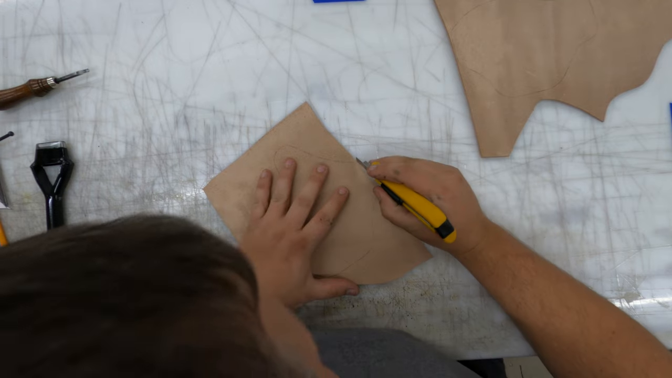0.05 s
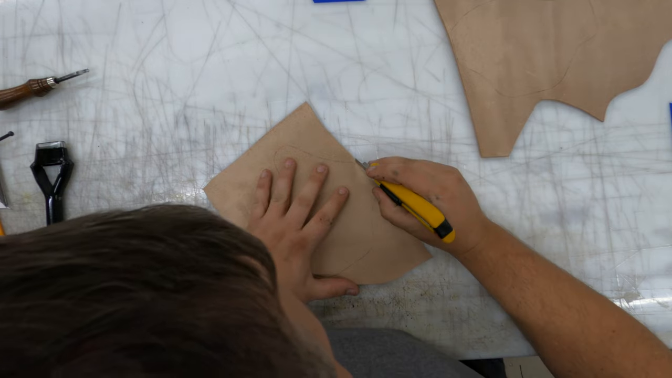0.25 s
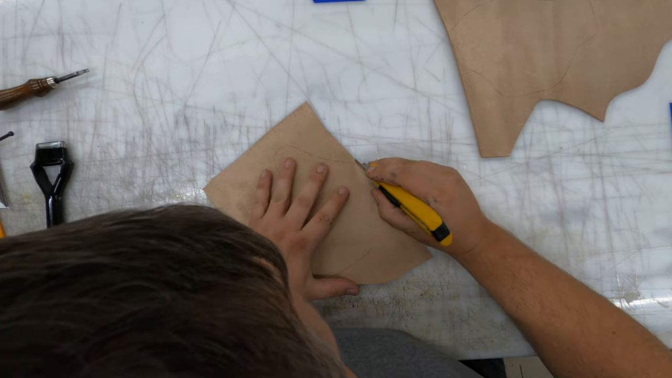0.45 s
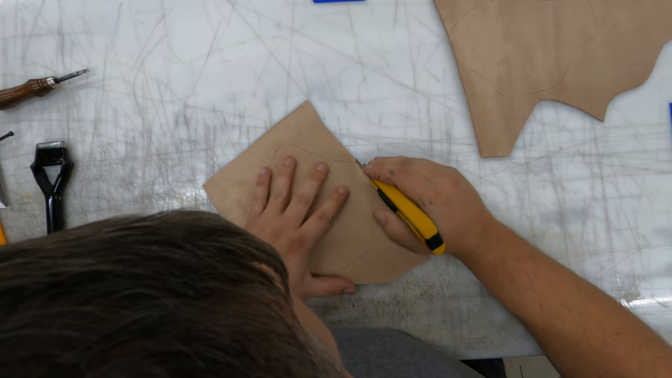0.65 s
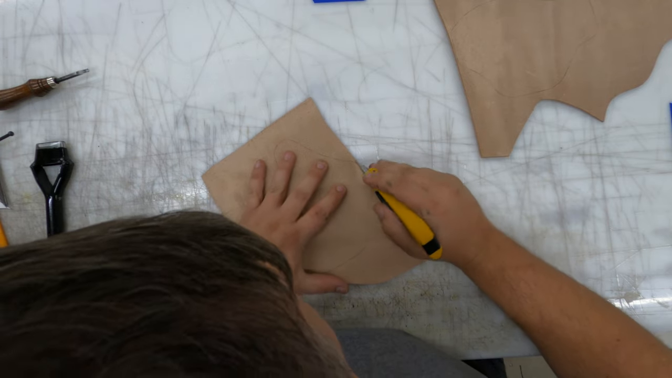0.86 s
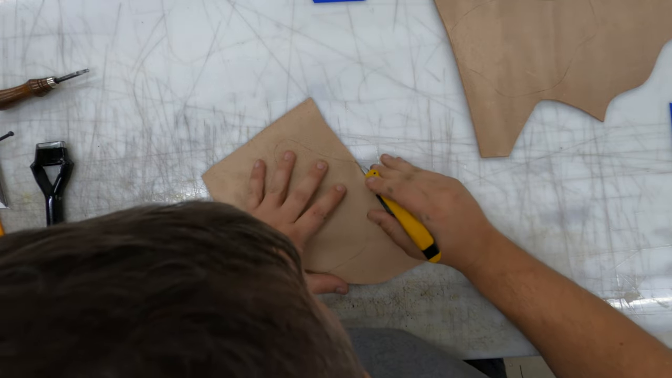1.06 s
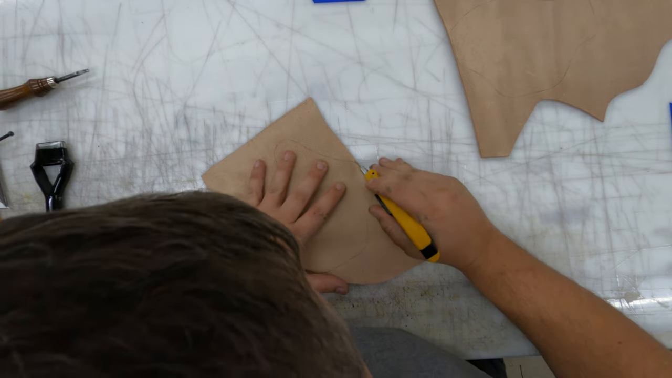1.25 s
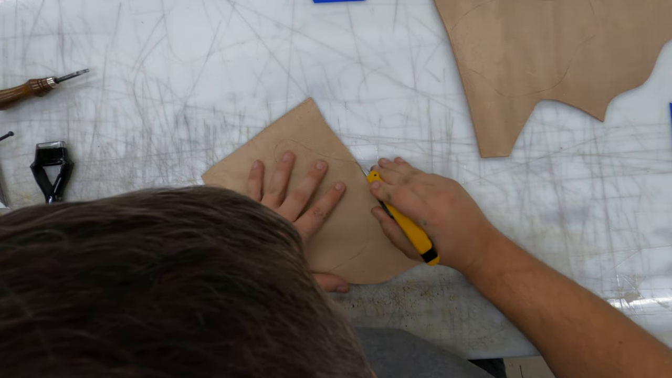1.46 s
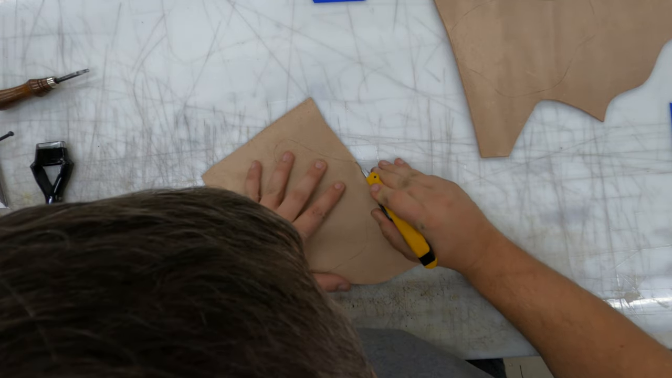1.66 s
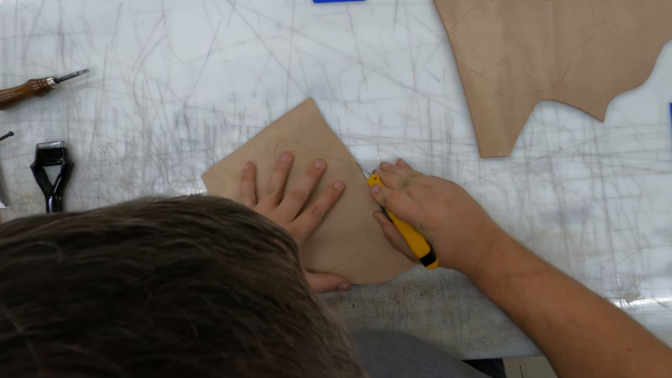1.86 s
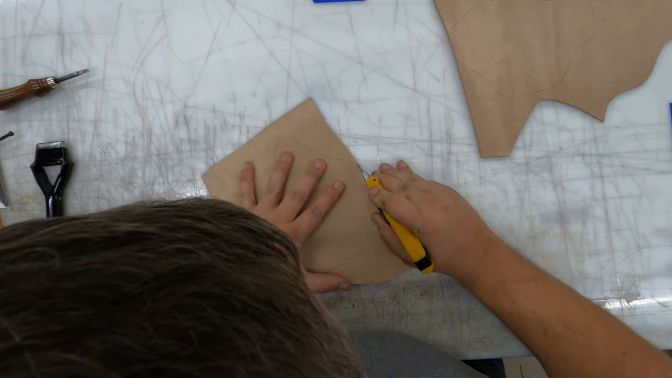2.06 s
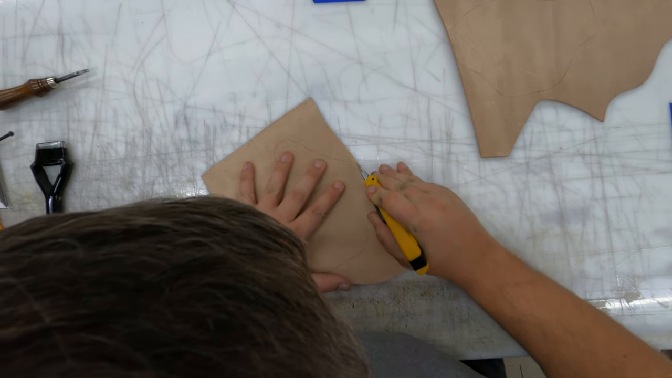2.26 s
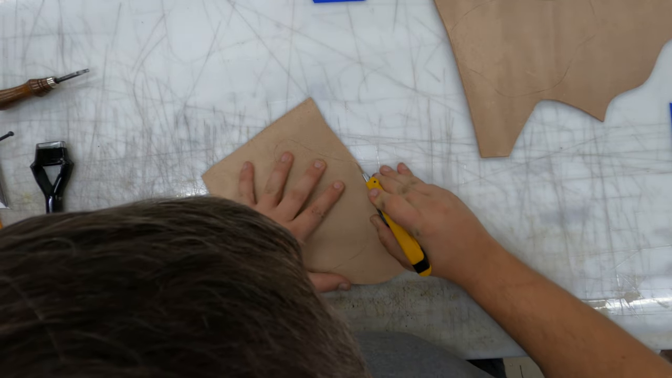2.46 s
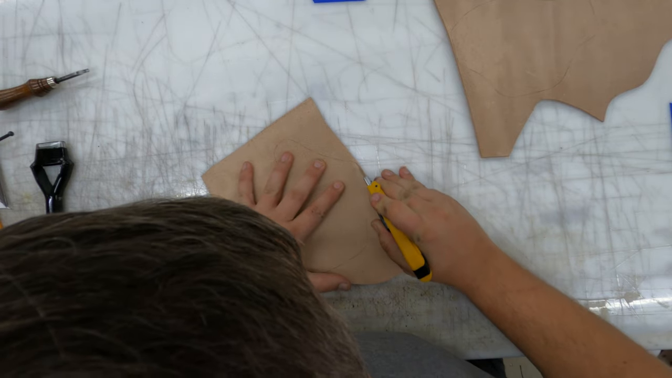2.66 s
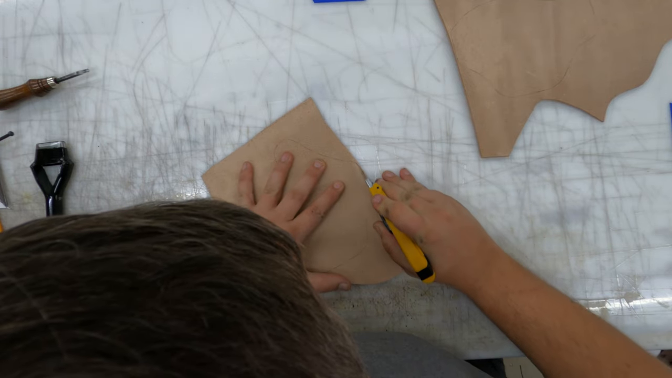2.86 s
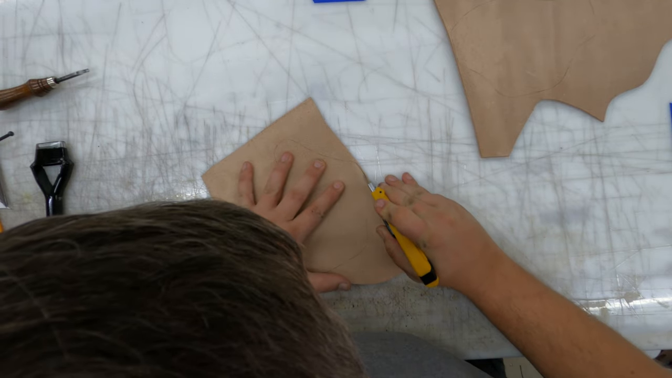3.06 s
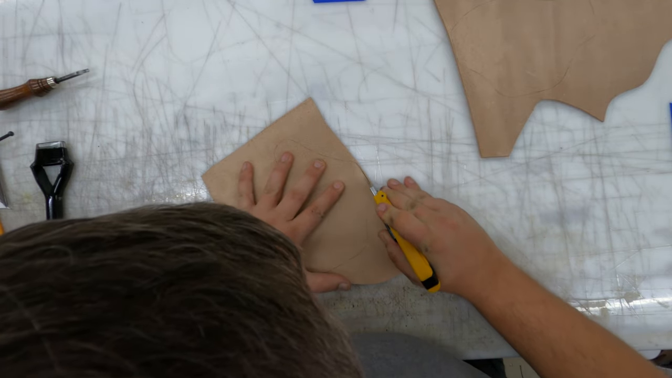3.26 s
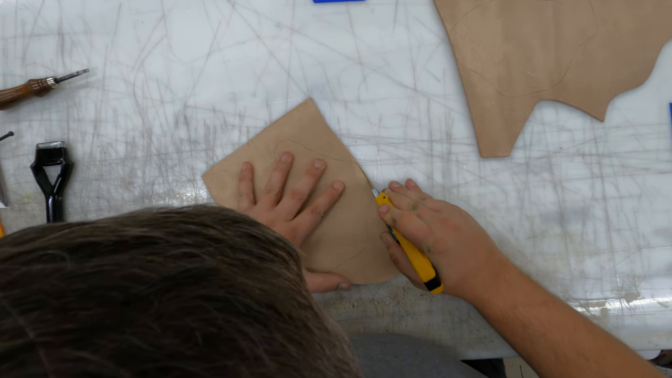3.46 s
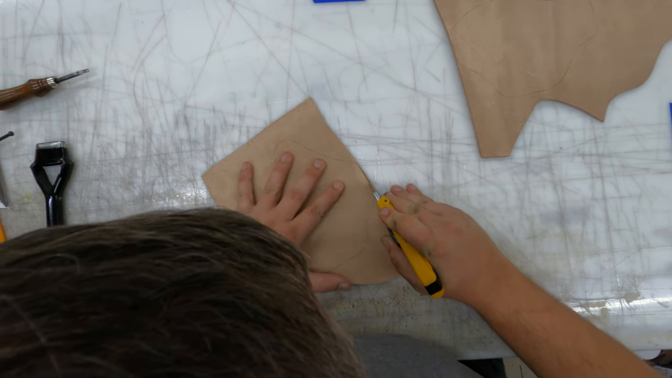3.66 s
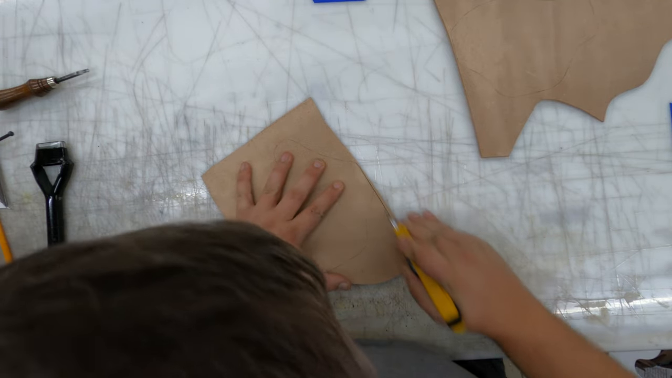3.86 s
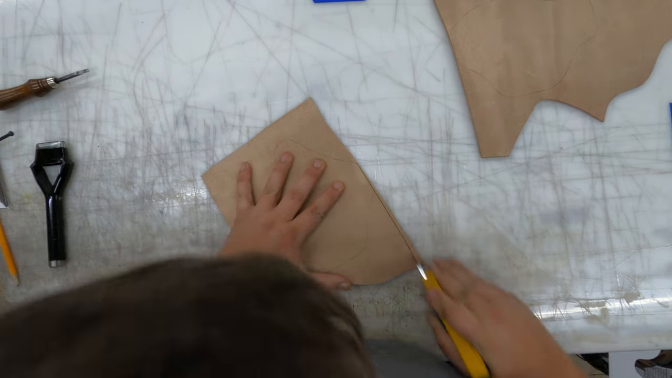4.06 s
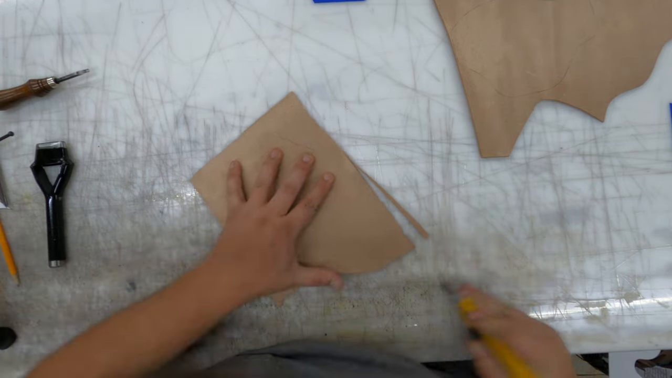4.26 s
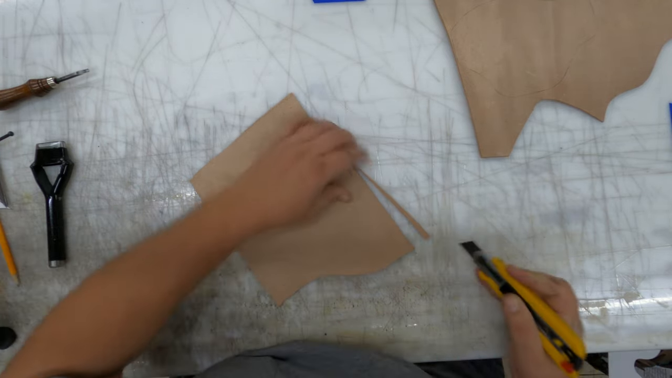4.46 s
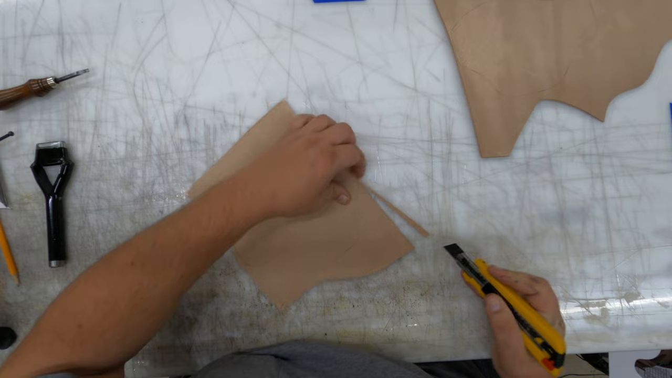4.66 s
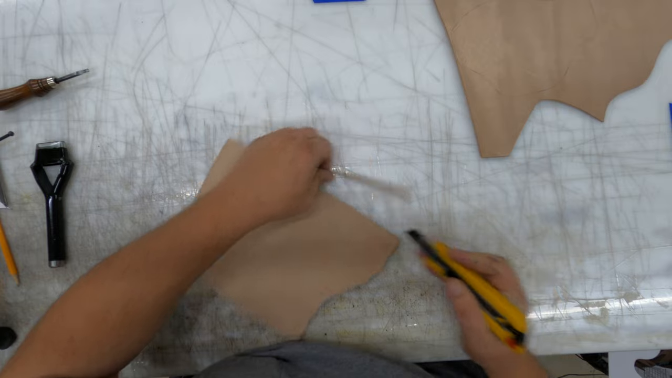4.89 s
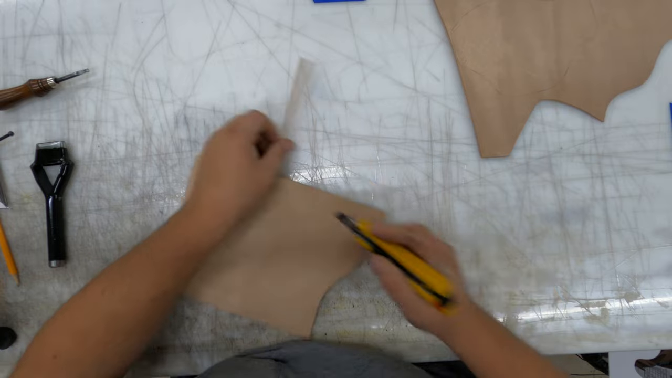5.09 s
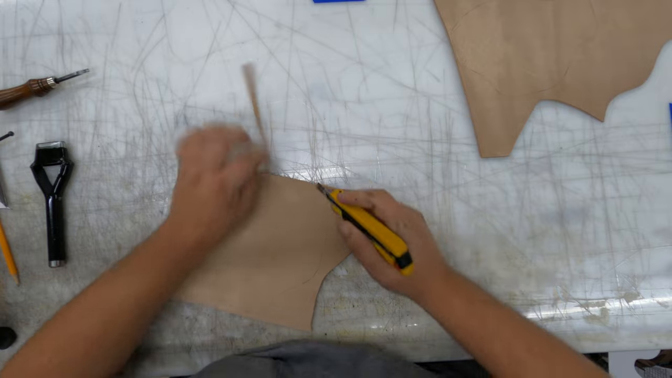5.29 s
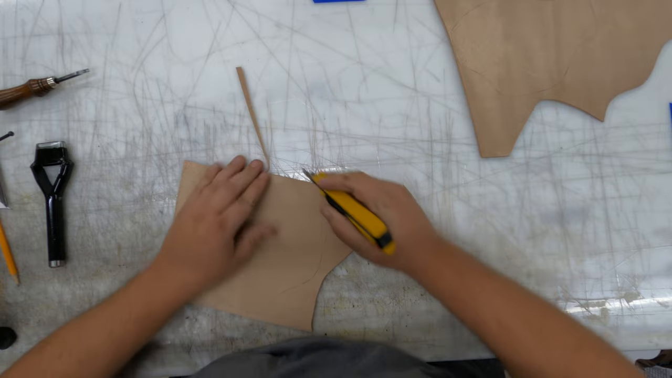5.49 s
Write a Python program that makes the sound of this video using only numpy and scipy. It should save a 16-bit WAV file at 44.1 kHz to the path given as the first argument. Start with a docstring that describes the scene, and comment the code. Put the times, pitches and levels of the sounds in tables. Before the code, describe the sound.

A utility knife trims thick leather on a plastic cutting board, close to the microphone in a quiet workshop with a short, dull echo. Small clicks of the knife and its loose blade sound during the first second. From about 1.5 to 2 seconds come firmer clicks and knocks as the knife is set down, with brief sliding of leather. Around 2.4 seconds the blade starts creeping through in faint, scratchy catches with a slight ring. At 3.7 seconds it speeds into one louder, hissing rasp that ends near 4.2. A couple of light clicks and a faint brush of skin follow. At 4.5 seconds a hand thumps the board softly, and the leather swivels, its rough back rubbing on the plastic among small knocks. The knife clicks down at about 5.3 seconds, followed by one more soft bump.

```python
"""A utility knife trims thick leather on a plastic cutting board, close by in a quiet workshop.
The blade creeps along in short catches, snapping fibres that make the knife ring, then runs out
in one quick stroke where the snaps blur into a rasp. Before the cut, the knife clicks as it is
set down. Afterwards a hand bumps the board and swivels the leather round, so that its rough back
rubs on the plastic, and the knife is set down again."""
import sys
import numpy as np
from scipy import signal
from scipy.fft import rfft, irfft
from scipy.io import wavfile
from scipy.ndimage import map_coordinates

SR = 44100
rng = np.random.default_rng(int(sys.argv[2]) if len(sys.argv) > 2 else 0)


def transcribe(signal):
    """Save signal, clipped to [-1, 1], as a 16-bit WAV file at the path in sys.argv[1]."""
    frames = np.atleast_2d(signal).T
    limited = np.clip(frames, -1, 1)
    pcm = np.round(limited * 32767).astype(np.int16)
    wavfile.write(sys.argv[1], SR, pcm)


N = 243873
T = np.arange(N) / SR
RUN_S, EXIT_S = 3.702, 4.178  # the blade starts to speed up; it leaves the leather
PUSH_ATTACK_S = 0.0079


def undb(db):
    """Turn decibels into a number to multiply by."""
    return 10 ** (np.asarray(db) / 20)


def unit(x):
    """Scale a sound to an average power of 1."""
    return x / np.sqrt(np.mean(x ** 2))


def fade(t, t60):
    """Start at t = 0 and die away, losing 60 dB every t60 seconds."""
    return (t >= 0) * np.exp(-np.log(1000) * np.maximum(t, 0) / t60)


def envelope(start_s, length_s, attack_s, t60):
    """Rise, hold until the length is over, then die away."""
    return np.clip((T - start_s) / attack_s, 0, 1) * fade(np.maximum(T - start_s - length_s, 0), t60)


def add(track, start_s, sound):
    """Mix a sound into the track at the given time."""
    i = max(int(start_s * SR), 0)
    track[i:i + len(sound)] += sound[:N - i]


def wander(rate):
    """A random drift, about 1 in size, that turns rate times a second."""
    return unit(np.interp(T * rate, np.arange(N), rng.standard_normal(N)))


def colour(x, points):
    """Shape the tone along (pitch_hz, level_db) points. Only the gaps between levels matter."""
    hz, db = np.transpose(points)
    octave = np.log2(np.maximum(np.fft.rfftfreq(8192, 1 / SR), 1))
    octaves_outside = np.maximum(np.log2(hz[0]) - octave, 0) + np.maximum(octave - np.log2(hz[-1]), 0)
    curve_db = np.interp(octave, np.log2(hz), db) - 20 * np.minimum(octaves_outside, 2)
    # build the filter so that it never sounds ahead of its input
    cepstrum = irfft(np.log(undb(curve_db)))
    half = len(cepstrum) // 2
    response = irfft(np.exp(rfft(2 * cepstrum[:half], 2 * half)))
    return signal.fftconvolve(x, response / np.linalg.norm(response))[:N]


def resonate(x, hz, width_hz):
    """Ring at one pitch; the narrower the width, the longer the ring."""
    return signal.lfilter(*signal.iirpeak(hz, hz / width_hz, fs=SR), x)


def ring(x, modes):
    """Shake an object's natural notes (modes); neighbouring ones swing in opposite directions."""
    response = sum((-1) ** k * undb(db) * np.sin(2 * np.pi * hz * T) * fade(T, t60)
                   for k, (hz, t60, db) in enumerate(modes))
    return signal.fftconvolve(x, response / np.linalg.norm(response))[:N]


def grains(rate, spread_db, slip_rate, slip_db, smooth):
    """Tiny snaps, rate a second, over smooth friction; sticking and slipping bunches them up."""
    snaps = (rng.random(N) < rate / SR) * rng.choice([-1, 1], N)
    sizes = undb(spread_db * np.clip(rng.standard_normal(N), -2, 2))
    friction = unit(snaps * sizes) + smooth * rng.standard_normal(N)
    return unit(friction * undb(slip_db * wander(slip_rate)))


# Tone of the quiet room: pitch_hz, level_db
ROOM_TONE = [(20, -2), (53, -13.5), (88, 0), (125, -4.5), (200, -6.5), (270, -10), (400, -15), (700, -18.5),
             (1600, -22.5), (3000, -26), (16000, -31.5)]

def background(room_db=-61, waver_db=1.0, hiss_db=-68.5):
    """Low room noise shared by both channels, plus each channel's own amplifier hiss."""
    air = unit(colour(rng.standard_normal(N), ROOM_TONE)) * undb(room_db + waver_db * wander(2.51))
    return air + undb(hiss_db) * rng.standard_normal((2, N))


def workshop_echo(dry, echo_db=-14, t60=0.23, dull_hz=2500):
    """The bench and walls add a short, dull echo."""
    t = T[:SR // 2]
    tail = rng.standard_normal(len(t)) * fade(t - .004, t60)
    tail = signal.sosfilt(signal.butter(1, dull_hz, fs=SR, output="sos"), tail / np.linalg.norm(tail))
    return dry + undb(echo_db) * signal.fftconvolve(dry, tail)[:N]


# A hand brushes past as the knife is lifted: start_s, length_s, level_db
SWISH = (4.32, 0.093, -57)
# Tone of skin on the board: pitch_hz, level_db
SKIN_TONE = [(3000, -12), (7000, -5), (13000, 0), (16000, -5)]

def hand_swish():
    """Skin skims the board with a short, bright hiss."""
    start_s, length_s, level_db = SWISH
    touch = np.sin(np.pi * np.clip((T - start_s) / length_s, 0, 1)) ** 2
    return colour(rng.standard_normal(N), SKIN_TONE) * touch * undb(level_db)


# Leather and hands sliding on the board: start_s, length_s, drag_db, hiss_db
SLIDES = [(0.573, 0.31, -64, -65), (1.07, .11, -65.5, -68), (1.505, 0.047, -57, -64),
          (1.759, 0.18, -53.5, -62), (4.238, 0.16, -62, -66), (4.663, .06, -57, -64.5),
          (4.725, 0.14, -52.5, -61.5), (4.837, .135, -55.5, -90), (5.072, 0.074, -58, -68),
          (5.226, 0.066, -55, -57), (5.452, 0.09, -66, -62.5)]
# Tone of the low drag: pitch_hz, level_db
DRAG_TONE = [(88, -27), (150, -7.5), (187, -6), (294, -10.5), (524, -7.5), (569, -12.5), (859, -8.5),
             (1210, -12.5), (1730, -14), (2410, -22.5), (4000, -30.5), (5200, -58), (8800, -120)]
# Tone of the hiss above it: pitch_hz, level_db
HISS_TONE = [(1760, -12.5), (3000, -10), (4930, -7.5), (6900, -10.5), (8820, -6.5), (10100, -15.5),
             (13300, -13), (16000, -20)]

def leather_rubbing(swivel_s=4.546, slowing_db_per_s=10.5, attack_s=0.045):
    """The leather's rough back drags over the board, which sings when the piece is swivelled."""
    turning = np.clip((T - swivel_s) / 0.19, 0, 1)  # a faint brushing stays from here on
    drag, hiss = turning * undb(-68), turning * undb(-62.5)
    for start_s, length_s, drag_db, hiss_db in SLIDES:
        slowing = undb(-slowing_db_per_s * np.clip(T - start_s, 0, length_s))
        drag += undb(drag_db) * slowing * envelope(start_s, length_s, attack_s, t60=0.19)
        hiss += undb(hiss_db) * slowing * envelope(start_s, length_s, attack_s, t60=0.49)
    roughness = grains(rate=4000, spread_db=1.5, slip_rate=65, slip_db=2.0, smooth=0.57)
    hum = unit(resonate(rng.standard_normal(N), hz=900, width_hz=70))
    hum *= turning * fade(T - swivel_s, t60=6.2) * undb(2)
    return (colour(roughness, DRAG_TONE) + hum) * drag + colour(roughness, HISS_TONE) * hiss * undb(-1)


# Soft blows of hand, knife and leather on the board: start_s, level_db, pitch_hz, fade_s
BUMPS = [(1.489, -40.5, 264, .022), (1.531, -34.5, 310, 0.027), (1.533, -38, 696, 0.026),
         (1.908, -32, 694, 0.03), (4.175, -43, 169, 0.052), (4.515, -24.5, 138, 0.025),
         (4.529, -38, 110, 0.054), (4.593, -31.5, 183, 0.018), (4.694, -48.5, 280, 0.065),
         (4.758, -38, 177, 0.034), (4.886, -37, 818, 0.043), (5.056, -26, 757, .012),
         (5.245, -33, 830, 0.014), (5.259, -39, 480, 0.026), (5.421, -26.5, 128, 0.011)]

def board_bumps(gain_db=4, ring_db=3):
    """Soft blows swing the board briefly and leave a faint ring."""
    t, thuds = T[:SR // 4], np.zeros(N)
    for start_s, level_db, pitch_hz, fade_s in BUMPS:
        press = np.sin(np.pi / 2 * np.minimum(t * pitch_hz / 0.55, 1)) ** 2
        swing = np.sin(2 * np.pi * pitch_hz * t) * fade(t, fade_s)
        add(thuds, start_s, undb(level_db + gain_db) * press * swing)
    return thuds + undb(ring_db) * resonate(thuds, hz=850, width_hz=11)


# Clicks of the knife and its loose blade: start_s, level_db, steel_extra_db, ping_hz
CLICKS = [(0.123, -64, -6, 3280), (0.1965, -61.5, 3, 3030), (.241, -52.5, -4, 3270),
          (0.442, -70, 19.5, 7950), (.4711, -48, 7.5, 5030), (.603, -58.5, 0, 1970),
          (0.7644, -54.5, -15, 3130), (1.487, -49, -9, 1350), (1.5306, -40, -3.5, 2080),
          (1.5543, -47, -8, 2140), (1.8025, -36.5, -7.5, 1410), (1.8335, -47.5, 0, 2080),
          (1.8523, -46, -4, 1490), (1.8657, -51.5, -6, 1530), (1.9075, -30, -9, 1410),
          (2.012, -59, 0, 5100), (4.268, -57, -1, 3180), (4.2931, -46.5, -5, 1830),
          (4.854, -45.5, -0.5, 1470), (4.934, -56, -12, 3520), (5.2506, -34, -10, 2090)]
# Natural notes of the board on its table: pitch_hz, fade_s, level_db
BOARD_MODES = [(113, 0.1, -5.5), (253, 0.065, -5.5), (407, 0.099, -7), (548, 0.04, -2.5), (716, 0.03, 3.5),
               (895, 0.064, -5), (1118, 0.019, 6), (1445, 0.016, 6.5), (1703, 0.011, 8)]
# Natural notes of the knife's plastic case: pitch_hz, fade_s, level_db
CASE_MODES = [(1794, 0.015, 8), (2080, 0.033, 3.5), (3250, 0.004, 5), (3400, 0.021, 0.5),
              (4400, 0.013, -19), (4930, 0.012, -29)]
# Natural notes of the steel blade: pitch_hz, fade_s, level_db
STEEL_MODES = [(5030, 0.017, -7), (7950, 0.0055, -3), (8840, 0.0053, 19), (11500, 0.005, -6)]
# Tone of a click in the case: pitch_hz, level_db
CASE_TONE = [(700, -6), (1400, -6), (2100, 1.5), (3000, 1.5), (5200, -1.5), (7000, -7.5)]
# Tone of a click in the steel: pitch_hz, level_db
STEEL_TONE = [(4000, -29), (6500, -8), (8200, 9.5), (10500, 3), (16000, -2.5)]

def knife_clicks(firm_db=-46, crack=3.2, push=5.1, onset_s=.0006):
    """Each click is a crack and a brief chatter in case and steel; a firm one also pushes the board."""
    t = T[:SR // 10]
    board, case, steel, pings = np.zeros((4, N))
    rise = np.minimum(t / onset_s, 1)
    blow = np.arange(len(t)) == int(onset_s * SR)
    for start_s, level_db, steel_extra_db, ping_hz in CLICKS:
        chatter = rng.standard_normal(len(t)) * rise * fade(t, t60=0.017)
        board_db = level_db - 0.66 * max(firm_db - level_db, 0)  # light clicks barely reach it
        add(board, start_s, undb(board_db) * (0.89 * chatter + push * blow))
        add(case, start_s, undb(level_db) * (chatter + crack * blow))
        add(steel, start_s, undb(level_db + steel_extra_db) * (chatter - crack * blow))
        ping = rise * np.sin(2 * np.pi * ping_hz * t) * fade(t, t60=0.014)
        add(pings, start_s, undb(level_db + 8) * ping)
    plastic = colour(case, CASE_TONE) + undb(-2.5) * ring(case, CASE_MODES)
    metal = colour(steel, STEEL_TONE) + undb(-13.5) * ring(steel, STEEL_MODES)
    return ring(board, BOARD_MODES) * undb(5) + plastic * undb(3) + metal * undb(5) + pings


def stroke_force(start_s=3.637, bear_down_s=0.13, rise_db=19.5, scrape_s=0.022):
    """The hand bears down to full force and holds it until the tip lifts off the board."""
    short_of_full = np.clip(1 - (T - start_s) / bear_down_s, 0, 1)
    contact = envelope(start_s, EXIT_S + scrape_s - start_s, PUSH_ATTACK_S, t60=0.17)
    return undb(-rise_db * short_of_full) * contact


def blade_speed(speed_up_s=.15):
    """How fast the blade moves: 0 is creeping, 1 is running."""
    return np.clip((T - RUN_S) / speed_up_s, 0, 1)


# Tone of the board under the cut: pitch_hz, level_db
RUMBLE_TONE = [(55, -13), (95, 0.5), (125, -2.5), (160, -5.5), (250, -4), (380, -12), (500, -17)]

def board_rumble(snaps):
    """Snapping fibres shake the board into a low rumble."""
    return colour(snaps, RUMBLE_TONE)


# Pushes of the blade through the leather, ending in short nudges: start_s, length_s, level_db
PUSHES = [(2.444, 0.19, -65), (2.636, .085, -60.5), (2.834, 0.041, -62), (2.873, 0.16, -59),
          (3.029, 0.24, -56), (3.346, 0.028, -60.5), (3.409, 0.041, -58), (3.479, 0.036, -58.5),
          (3.534, 0.052, -57), (3.622, 0.016, -59)]
# Natural notes of the knife pressed into the board: pitch_hz, width_hz, level_db
KNIFE_MODES = [(739, 31, 8.5), (1512, 170, 5.5), (1830, 80, 0), (2075, 45, 0.5), (2614, 250, -3),
               (3430, 190, -8.5), (4070, 120, -5.5), (5260, 100, -20), (7680, 490, -11.5), (8460, 170, -5),
               (9580, 98, -12), (10640, 130, -15), (13100, 1300, -19)]
# Tone of the creeping cut: pitch_hz, level_db
CREEP_TONE = [(210, -36), (350, -3), (498, -8.5), (730, -5), (817, 1.5), (1550, -4.5), (2310, -19),
              (2750, -15), (6530, -12.5), (8570, -14.5), (16000, -19.5)]

def slow_cut(catch_every_s=0.044, catch_length_s=0.02, breakaway_db=3.5, full_catch_db=-59):
    """Fibres part one by one and ring the knife; at each catch the blade slips and tears a bunch."""
    push, catches = np.zeros((2, N))
    jitter_s = 0.0015 * wander(24)
    for start_s, length_s, level_db in PUSHES:
        age_s = T - start_s
        progress = np.clip(age_s / length_s, 0, 1)
        effort = envelope(start_s, length_s, PUSH_ATTACK_S, t60=0.14)
        effort *= undb(level_db - 7 * (progress - 0.49) ** 2)  # hardest near the middle
        push += effort
        slip = np.minimum((age_s + jitter_s) % catch_every_s / catch_length_s, 1)
        # the first catch gets a boost; light pushes scrape more smoothly
        grip_db = breakaway_db * (age_s < catch_length_s) - 0.88 * max(full_catch_db - level_db, 0)
        catches += effort * np.sin(np.pi * slip) * undb(grip_db)
    snaps = grains(rate=2200, spread_db=5.5, slip_rate=220, slip_db=2.5, smooth=0.39)
    ringing = unit(sum(undb(db) * resonate(snaps, hz, width) for hz, width, db in KNIFE_MODES))
    knife = unit(ringing + undb(-4.5) * colour(snaps, CREEP_TONE))
    run_up = stroke_force()
    cutting = push * undb(1.17) + catches * undb(-3) + run_up * undb(-40)
    shaking = push * undb(1) + catches * undb(-8) + run_up * undb(-52)
    creeping = np.cos(np.pi / 2 * blade_speed())
    return creeping * (knife * cutting + board_rumble(snaps) * shaking)


def blade_song(hz, width_hz):
    """Friction makes the thin blade sing: a band of noise around a moving pitch."""
    lowpass = signal.butter(2, width_hz / 2, fs=SR, output="sos")
    swing = signal.sosfilt(lowpass, rng.standard_normal(N) + 1j * rng.standard_normal(N))
    return unit(np.real(swing * np.exp(2j * np.pi * np.cumsum(hz) / SR)))


def moving_contact(x, depth_db=4.1, spacing_hz=300, life_s=.04, rise_hz_per_s=4000):
    """As the point of contact moves, ringing pitches come and go, each gliding upward."""
    hz, t, spectrum = signal.stft(x, SR, nperseg=512)
    place = np.broadcast_arrays((hz[:, None] - rise_hz_per_s * t) / spacing_hz, t / life_s)
    strength = map_coordinates(rng.standard_normal(size=(128, 128)), place, order=3, mode="wrap")
    return unit(signal.istft(spectrum * undb(depth_db * strength), SR)[1][:N])


# Tone of the running blade's rasp: pitch_hz, level_db
RASP_TONE = [(240, -38), (400, -10.5), (511, -22), (700, -1.5), (796, -10), (884, 4), (1030, -3), (1530, 2),
             (1820, -4), (3080, -6.5), (3420, -12), (3940, -4.5), (6500, -20.5), (8450, -35), (14300, -120)]
# Tone of the hiss of tearing fibres: pitch_hz, level_db
FIBRE_TONE = [(3240, -12.5), (5500, -7.5), (7130, 0.5), (7590, 2), (8300, -1), (9660, 0.5), (10600, -3.5),
              (13100, -1), (14000, -4), (16000, -13)]

def quick_stroke(rasp_db=-39.5, hiss_db=-38.5, rumble_db=-46, rumble_fall_db_per_s=17.5, exit_db=-10):
    """At speed the snaps merge into a rasp, whose tone sweeps upward as the edge comes near."""
    snaps = grains(rate=5000, spread_db=5, slip_rate=340, slip_db=1.22, smooth=0.6)
    running_s = np.maximum(T - RUN_S, 0)
    progress = np.minimum(running_s / (EXIT_S - RUN_S), 1)
    # vibration bounces back from the leather's edge, sooner as the blade nears it
    lag_s = np.interp(progress, [0, 1], [.00042, .00033])
    snaps = moving_contact(snaps + 0.12 * np.interp(T - lag_s, T, snaps))
    # the blade's lower note wavers and fades; its upper note climbs and grows
    flex = np.minimum(running_s / 0.24, 1)
    lower = blade_song(8420 + 260 * wander(22), width_hz=1200) * undb(-3 * progress)
    upper = blade_song(10900 + 2420 * flex, width_hz=2800) * undb(-13 + 10 * progress)
    swell = undb(-14 * (progress - 0.59) ** 2)  # strongest just past halfway
    hiss = (colour(snaps, FIBRE_TONE) * swell + undb(-3.5) * (lower * swell + upper)) * undb(hiss_db)
    rumble = board_rumble(snaps) * undb(rumble_db - rumble_fall_db_per_s * running_s)
    rasp = colour(snaps, RASP_TONE) * undb(rasp_db + progress)  # grows 1 dB as the tip digs in
    tearing = np.where(T < EXIT_S, 1, undb(exit_db))  # past the edge the tip only scrapes the board
    running = np.sin(np.pi / 2 * blade_speed())
    return running * stroke_force() * (rasp + rumble + hiss * tearing)


def scene():
    """All the work happens straight under one microphone, over the room's quiet noise."""
    work = slow_cut() + quick_stroke() + leather_rubbing() + hand_swish()
    work += knife_clicks() + board_bumps()
    return workshop_echo(work) + background()


def record(dry, top_hz=15900):
    """The recorder cuts off the highest treble."""
    return signal.sosfilt(signal.ellip(10, .2, 70, top_hz, fs=SR, output="sos"), dry)


dry = scene()
out = record(dry)
transcribe(out)
```